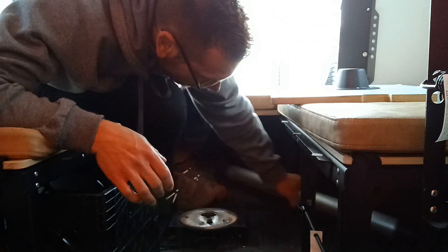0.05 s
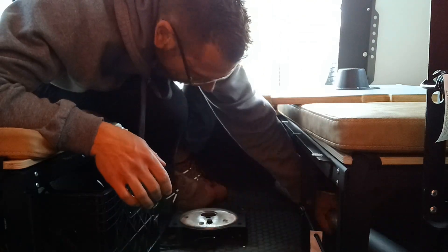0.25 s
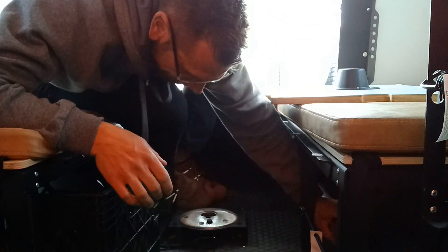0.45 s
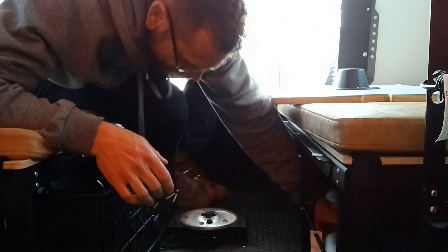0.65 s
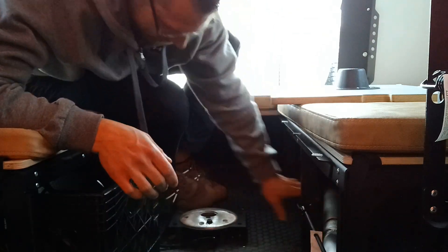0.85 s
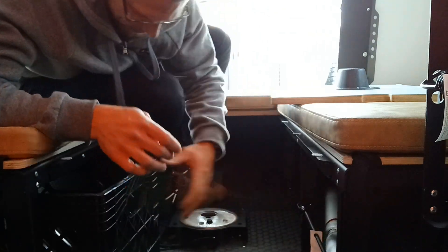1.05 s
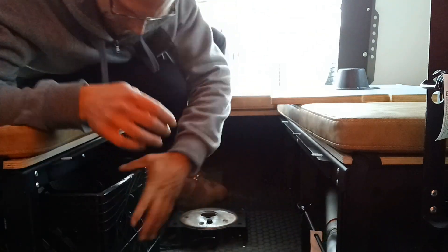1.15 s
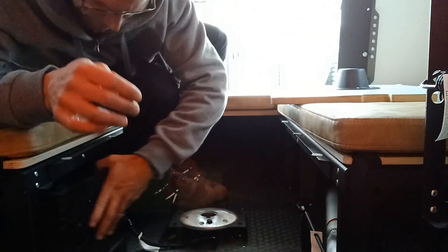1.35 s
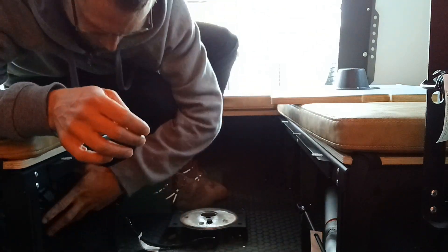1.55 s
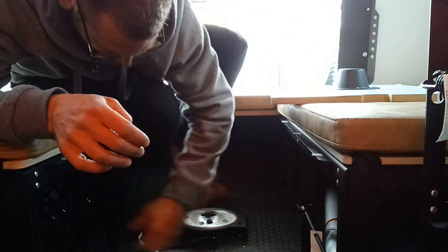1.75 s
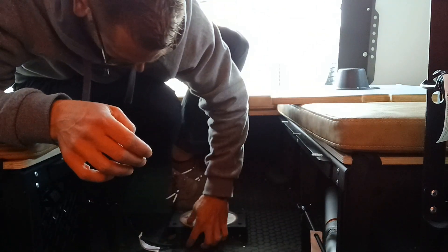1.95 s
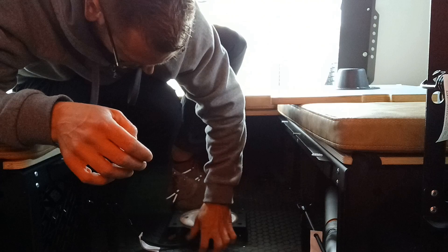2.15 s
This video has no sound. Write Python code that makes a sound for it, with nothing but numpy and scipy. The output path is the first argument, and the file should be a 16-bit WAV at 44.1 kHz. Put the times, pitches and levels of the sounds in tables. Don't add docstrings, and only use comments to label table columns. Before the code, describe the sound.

Metal leg clatters down with floor thumps, followed by a crate shove and a hard hand slap

```python
import sys
import numpy as np
from scipy import signal
from scipy.fft import rfft, irfft
from scipy.io import wavfile
from scipy.ndimage import uniform_filter1d

SR = 44100
rng = np.random.default_rng(int(sys.argv[2]) if len(sys.argv) > 2 else 0)


def wav_record(signal):
    frames = np.transpose(np.atleast_2d(signal))
    bounded = np.clip(frames, -1, 1)
    quanta = np.round(bounded * 32767).astype(np.int16)
    wavfile.write(sys.argv[1], SR, quanta)


def boost(x):
    u = np.asarray(x, float) / 20
    return 10 ** u


N = 97020

# (frequency [Hz], density [dB per Hz])
WASH_COLOUR = [(88, -56), (150, -13), (480, -11), (1150, -7), (2200, -16), (2900, -31.5), (6000, -35.5),
               (16000, -60)]
# (time [s], level [dB])
WASH_RISE = [(0, -2), (0.45, 3), (0.9, 0.5), (1.8, 6), (2.07, 10), (2.2, 13.5)]
# (time [s], level [dB])
HISS_LEVEL = [(0, -80), (1.0, -75.5), (1.85, -78), (2.07, -88), (2.2, -82)]
# (time [s], level [dB])
SLEEVE_LEVEL = [(0, -62), (0.9, -71), (1.15, -56.5), (1.5, -36), (1.85, -62), (2.08, -54.5), (2.2, -55)]
# (frequency [Hz], density [dB per Hz])
SLEEVE_COLOUR = [(880, -53), (1500, 11), (9220, -12), (12700, -9), (15700, -11), (16500, -48)]
# (frequency [Hz], left-right likeness [0 to 1])
PORT_LIKENESS = [(30, 0.44), (80, 0.93), (250, 0.85), (550, 0.66), (1000, 0.14), (16000, 0)]
# (frequency [Hz], t60 [s])
CABIN_DECAY = [(100, 0.37), (500, 0.39), (1500, 0.21), (5000, 0.22), (9000, 0.16), (14000, 0.17)]

# (time [s], level [dB], brightness [dB per octave], ring [dB], left-right [dB])
RATTLE_HITS = [
    (-0.004, -38, -0.5, -8, 1.5),
    (0.026, -45, -2.5, 3, -3.5),
    (0.048, -45.5, 0.5, 8, 5),
    (0.064, -46.5, -3.5, -5.5, -6),
]
# (frequency [Hz], density [dB per Hz])
RATTLE_SPECTRUM = [(180, -30), (300, -16.5), (3140, -9), (4390, -17.5), (13500, -31.5), (15700, -31),
                   (16500, -70.5)]
# (frequency [Hz], level [dB], t60 [s])
HELD_MODES = [(877, -10, .12), (1389, -4, .12), (1615, 0, .13), (2089, -5, .12), (2546, -4, .13),
              (3052, -3, .15), (3700, -12, .1), (4900, -16, .05), (6966, -18, .06)]
# (time [s], level [dB], brightness [dB per octave], ring [dB], left-right [dB])
LEG_CLANKS = [
    (0.199, -20.5, 2, 4.5, 3.5),
    (0.213, -24.5, -0.5, -9, -15),
    (0.228, -26, -1, -8.5, 8),
    (0.24, -28, 2, -23.5, 6.5),
    (0.282, -26.5, -3.5, -6.5, -2),
    (0.352, -37.5, -2.5, -17, -2.5),
    (0.507, -48.5, 1, -10.5, 0),
    (0.531, -35, 0, -23, -0.5),
    (0.562, -43.5, -0.5, -7, 0),
]
# (frequency [Hz], density [dB per Hz])
LEG_SPECTRUM = [(60, -45), (120, -14), (550, -7), (780, -13.5), (1700, -9.5), (3500, -12.5), (4400, -21.5),
                (5600, -18), (16500, -35)]
# (frequency [Hz], level [dB], t60 [s])
TUBE_MODES = [(365, -3, 0.15), (496, -7.5, 0.18), (615, -8, 0.3), (680, -10, .15), (915, -7, 0.16),
              (1008, -9.5, 0.1), (1146, -10.5, 0.41), (1233, -12, .13), (1546, -1.5, 0.28),
              (1830, -4, 0.12), (3047, -16, 0.16), (3430, -7, .18), (5545, -12, .13), (6940, -19, .14)]
# (time [s], level [dB], brightness [dB per octave], ring [dB], left-right [dB])
COLLAR_TICKS = [
    (0.331, -36.5, 9.5, -0.5, -1.5),
    (0.374, -43, 3.5, -1, 6),
    (0.7, -67, 6.5, -10, 10),
    (0.75, -67, 2, -14, 2),
    (2.124, -59, 1.5, -19.5, 4),
]
# (frequency [Hz], level [dB], t60 [s])
COLLAR_MODES = [(2805, -1, 0.16), (4823, -14, .1), (5300, -9, 0.13), (6035, -18, .1), (6880, -5, .2),
                (7010, -4, 0.22), (7900, -10, .06)]

# (time [s], level [dB], pitch [Hz], t60 [s], left-right [dB])
PANEL_BLOWS = [(0.201, -35.5, 119, 0.16, -2), (0.281, -29, 192, 0.02, -12), (0.2901, -20, 232, 0.03, -1),
               (0.294, -28, 228, 0.024, -10), (0.286, -33, 115, 0.071, -6.5), (0.304, -36, 205, 0.072, -9),
               (0.321, -27.5, 133, 0.022, -5), (0.35, -33, 201, 0.18, 1.5), (0.378, -38.5, 150, 0.064, -5),
               (0.398, -38, 194, 0.035, -9), (0.429, -36, 107, 0.12, 1), (0.534, -36, 95, 0.015, 1),
               (0.538, -24, 185, 0.057, -2.5), (0.55, -25, 114, 0.044, -5.5), (0.565, -30, 83.6, 0.02, -3),
               (0.581, -32, 141, .015, -4), (0.604, -35, 166, 0.05, -3), (0.632, -35, 75.7, 0.13, -1),
               (0.671, -37.5, 99, .1, -3.5), (0.723, -39.5, 92.1, 0.6, -0.5), (1.26, -44, 63, 0.081, -6),
               (1.62, -34.5, 357.5, 0.071, 5), (1.655, -37, 425, 0.17, -1), (1.69, -41.5, 243, 0.023, 0.5),
               (1.704, -38.5, 100, 0.07, -5), (1.744, -42.5, 262, 0.027, -1), (1.776, -37, 81, 0.13, -1),
               (1.801, -40, 93, 0.54, -2)]
# (time [s], level [dB])
SWAY_LEVEL = [(0.0, -32.5), (0.16, -51), (0.21, -33), (0.26, -37), (0.29, -24), (0.5, -38), (0.541, -22),
              (0.58, -17.5), (0.609, -31.5), (0.94, -45), (1.17, -43), (1.25, -25), (1.35, -30.5),
              (1.5, -29), (1.62, -32.5), (2.17, -40), (2.2, -34)]
# (frequency [Hz], density [dB per Hz])
SWAY_SPECTRUM = [(20, -16), (45, 2), (110, -1), (200, -11.5), (400, -22.5), (1000, -57)]

# (time [s], level [dB], brightness [dB])
CRATE_PUSH = [(1.1, -72, 13), (1.233, -39.5, 1), (1.31, -37, 6), (1.36, -30.5, 7), (1.51, -26, 2.5),
              (1.538, -32.5, 4), (1.548, -24, -17.5), (1.634, -32, 13), (1.644, -39, 8.5),
              (1.849, -51.5, -8)]
# (frequency [Hz], density [dB per Hz])
SCRAPE_SPECTRUM = [(24, -29), (40, -16), (390, -8.5), (593, 2.5), (823, -6), (1140, -5), (12800, -38),
                   (15300, -38.5), (16500, -59.5)]
# (frequency [Hz], width [Hz], level [dB])
CRATE_WALLS = [(640, 39, -13), (1070, 75, 3), (1126, 300, 1.5), (1570, 210, 1.5), (2040, 150, -9),
               (3600, 510, -8.5), (5200, 2300, -7), (5600, 360, -20)]
# (time [s], level [dB], brightness [dB per octave], chatter [s], left-right [dB])
CRATE_KNOCKS = [
    (1.183, -46.5, 6.5, 0.017, 3),
    (1.192, -45.5, 1.5, 0.0091, 0),
    (1.221, -47, 6.5, .01, 4),
    (1.316, -40.5, -1, 0.012, 8),
    (1.354, -30, -3, 0.011, 1),
    (1.384, -36, -2, .01, 2),
    (1.54, -16, 1, 0.033, 0.5),
    (1.5858, -17, 1.5, 0.028, -1),
    (1.621, -33.5, -7, 0.0035, -13),
]
# (frequency [Hz], density [dB per Hz])
KNOCK_SPECTRUM = [(88, -45.5), (150, -15), (669, -7), (2500, -13.5), (4690, -12), (13000, -33),
                  (15600, -38), (16500, -66.5)]
# (time [s], level [dB], brightness [dB per octave], chatter [s], left-right [dB])
SOCKET_SLAPS = [
    (1.887, -15.5, 0.5, 0.018, 1.5),
    (1.895, -19.5, 2, 0.016, -1),
    (1.93, -49, -10, 0.016, -24),
]
# (frequency [Hz], density [dB per Hz])
SLAP_SPECTRUM = [(150, -27.5), (500, -12.5), (800, -10), (2150, -12), (2500, -20), (3200, -12.5),
                 (5700, -13.5), (16500, -26.5)]
# (frequency [Hz], width [Hz], level [dB])
SOCKET_BODY = [(786, 60, -2), (965, 93, 1), (1142, 70, 7), (1650, 250, -3.5), (2120, 80, -4),
               (3890, 340, -4), (4730, 190, -4), (5450, 250, -1)]
# (time [s], level [dB], brightness [dB per octave], chatter [s], left-right [dB])
MAT_PATS = [
    (2.181, -37, 0, .02, 1.5),
    (2.186, -34.5, -0.5, .02, 2.5),
]
# (frequency [Hz], density [dB per Hz])
PAT_SPECTRUM = [(200, -22), (1000, -2), (2500, -8), (5600, -14.5), (6500, -28), (16500, -38)]

WASH_DB = -53.5
LEG_CHATTER_S, LEG_RISE_S, TICK_RISE_S, KNOCK_RISE_S = 0.0083, 0.0042, 0.001, 0.00052
PANEL_HOLD_TURNS, PANEL_RISE_S, PANEL_TAIL_DB = 1.73, 0.0032, -10
SLIPS_PER_S, SLIP_SPREAD_DB = 3000, 1
SCRAPE_RING_DB, SCRAPE_WET_DB, SCRAPE_PAN_DB = -5.5, -0.5, -1.5
LOW_HZ, EDGE_HZ = 37.4, 15900


def evened(x):
    return x / np.sqrt(np.mean(x ** 2) + 1e-20)


def struck(x):
    return x / np.sqrt(np.mean(x[:, :SR * 3 // 100] ** 2))


def over_time(points):
    s, value = np.transpose(points)
    return np.interp(np.arange(N) / SR, s, value)


def read(points, hz):
    f, value = np.transpose(points)
    return np.interp(np.log(hz + 1), np.log(f + 1), value)


def add(mix, s, sound, pan_db):
    at = round(s * SR)
    sound = sound[:, max(-at, 0):]
    part = mix[:, max(at, 0):][:, :sound.shape[-1]]
    panned = sound * boost(np.array([[pan_db / 2], [-pan_db / 2]]))
    part += panned[:, :part.shape[1]]


def likeness(hz):
    same = np.clip(read(PORT_LIKENESS, hz), 0, 1)
    return same, np.sqrt(1 - same ** 2)


def paired(a, b):
    same, apart = likeness(np.fft.rfftfreq(len(a), 1 / SR))
    return np.array([a, irfft(same * rfft(a) + apart * rfft(b), len(a))])


def paired_noise(count):
    return paired(*rng.standard_normal((2, count)))


def coloured(x, colour, tilt_db=0):
    hz = abs(np.fft.fftfreq(4096, 1 / SR))
    tilt = tilt_db * np.log2((hz + 50) / 2000)
    log_gain = np.log(boost(read(colour, hz) + tilt))
    taps = np.fft.ifft(np.exp(np.conj(signal.hilbert(log_gain)))).real[:2048]
    return signal.fftconvolve(x, taps[None], axes=1)[:, :x.shape[1]]


def resonate(x, peaks):
    out = 0
    for hz, width, db in peaks:
        r = np.exp(-np.pi * width / SR)
        pole = r * np.exp(2j * np.pi * hz / SR)
        out = out + boost(db) * signal.lfilter([1 - r], [1, -pole], x).real
    return out


def cabin():
    hz, t, z = signal.stft(paired_noise(SR // 2), SR, nperseg=128)
    decay = boost(-60 * t / read(CABIN_DECAY, hz)[:, None])
    tail = signal.istft(z * decay, SR, nperseg=128)[1]
    return tail / np.linalg.norm(tail[0])


def clack(hold, rise, colour, tilt_db):
    tail = coloured(cabin(), colour, tilt_db)
    t = np.arange(tail.shape[1]) / SR
    lumps = boost(0.44 * evened(uniform_filter1d(rng.standard_normal(len(t)), 60)))
    early = 1 + 0.45 * np.exp(-(t / hold) ** 2)
    return struck(tail * lumps * np.minimum(t / rise, 1) * early)


def air():
    swell = evened(uniform_filter1d(uniform_filter1d(rng.standard_normal(N), 3000), 3000))
    wash = evened(coloured(paired_noise(N), WASH_COLOUR))
    wash = wash * boost(WASH_DB + 1.9 * swell + over_time(WASH_RISE))
    hiss = boost(over_time(HISS_LEVEL)) * rng.standard_normal((2, N))
    rustle = evened(coloured(rng.standard_normal((2, N)), [(400, -38)] + list(SLEEVE_COLOUR)))
    rustle = rustle * boost(over_time(SLEEVE_LEVEL) + 0.85 * swell[::-1])
    return wash + hiss + rustle


def rings(modes):
    t = np.arange(SR // 3) / SR
    wander = rng.standard_normal((2, len(modes), 2, len(t)))
    a, b = uniform_filter1d(uniform_filter1d(wander, 220, 3), 220, 3)
    phase = np.exp(2j * np.pi * rng.random((len(modes), 2, 1)))
    flutter = phase + 0.43 * (a + 1j * b) / np.std(a)
    same, apart = likeness(np.transpose(modes)[0])
    flutter[:, 1] = same[:, None] * flutter[:, 0] + apart[:, None] * flutter[:, 1]
    out = 0
    for (hz, db, t60), f in zip(modes, flutter):
        out = out + boost(db - 60 * t / t60) * (np.exp(2j * np.pi * hz * t) * f).real
    return struck(np.minimum(t / 0.0042, 1) * out)


def leg(mix):
    for rows, modes, colour, rise in (
            (RATTLE_HITS, HELD_MODES, RATTLE_SPECTRUM, LEG_RISE_S),
            (LEG_CLANKS, TUBE_MODES, LEG_SPECTRUM, LEG_RISE_S),
            (COLLAR_TICKS, COLLAR_MODES, LEG_SPECTRUM, TICK_RISE_S)):
        for s, db, tilt_db, ring_db, pan_db in rows:
            add(mix, s, boost(db) * clack(LEG_CHATTER_S, rise, colour, tilt_db), pan_db)
            add(mix, s, boost(db + ring_db) * rings(modes), pan_db)
    return mix


def panel(mix):
    t = np.arange(SR // 4) / SR
    for s, db, hz, t60, pan_db in PANEL_BLOWS:
        decay = boost(-60 * np.maximum(t - PANEL_HOLD_TURNS / hz, 0) / t60)
        bend = np.sin(2 * np.pi * hz * t) * decay * np.minimum(t / PANEL_RISE_S, 1)
        bend = struck(bend[None])
        tail = signal.fftconvolve(bend, cabin(), axes=1)[:, :len(t)]
        tail = tail / np.linalg.norm(tail[0]) * np.linalg.norm(bend)
        add(mix, s, boost(db) * (bend + boost(PANEL_TAIL_DB) * tail), pan_db)
    sway = evened(coloured(paired_noise(N), SWAY_SPECTRUM))
    return mix + sway * boost(over_time(SWAY_LEVEL) - 5)


def scrape():
    s, level_db, bright_db = np.transpose(CRATE_PUSH)
    t = np.arange(N) / SR
    slips = (rng.random((2, N)) < SLIPS_PER_S / SR) * rng.standard_normal((2, N))
    slips = slips * boost(SLIP_SPREAD_DB * np.minimum(rng.exponential(1, (2, N)), 3))
    x = evened(coloured(paired(*slips), SCRAPE_SPECTRUM))
    x = evened(x + boost(SCRAPE_RING_DB) * evened(resonate(x, CRATE_WALLS)))
    high = signal.sosfilt(signal.butter(2, 1800, "high", fs=SR, output="sos"), x)
    x = x + high * (boost(np.interp(t, s, bright_db)) - 1)
    x = x * boost(np.interp(t, s, level_db, -120, -120))
    x = x + boost(SCRAPE_WET_DB) * signal.fftconvolve(x, cabin(), axes=1)[:, :N]
    return x * boost(np.array([[SCRAPE_PAN_DB / 2], [-SCRAPE_PAN_DB / 2 - 0.5]]))


def knocks(mix):
    for rows, colour, body, ring_db in (
            (CRATE_KNOCKS, KNOCK_SPECTRUM, CRATE_WALLS, -3),
            (SOCKET_SLAPS, SLAP_SPECTRUM, SOCKET_BODY, -1),
            (MAT_PATS, PAT_SPECTRUM, SOCKET_BODY, -6)):
        for s, db, tilt_db, hold, pan_db in rows:
            hit = clack(hold, KNOCK_RISE_S, colour, tilt_db)
            ring = struck(resonate(hit, body))
            add(mix, s, boost(db) * struck(hit + boost(ring_db) * ring), pan_db)
    return mix


def scene():
    mix = air() + scrape()
    return knocks(panel(leg(mix)))


def top_cut(x):
    return signal.sosfilt(signal.butter(12, 16870, fs=SR, output="sos"), x)


def record(dry):
    x = signal.sosfilt(signal.butter(4, LOW_HZ, "high", fs=SR, output="sos"), dry)
    x = x + resonate(x, [(11950, 790, -0.68)])
    edge = signal.ellip(8, 0.2, 50, EDGE_HZ, "high", fs=SR, output="sos")
    x = x - 0.93 * signal.sosfiltfilt(edge, x)
    return top_cut(0.87 * np.tanh(x / 0.9))


dry = scene()
out = record(dry)
wav_record(out)
```